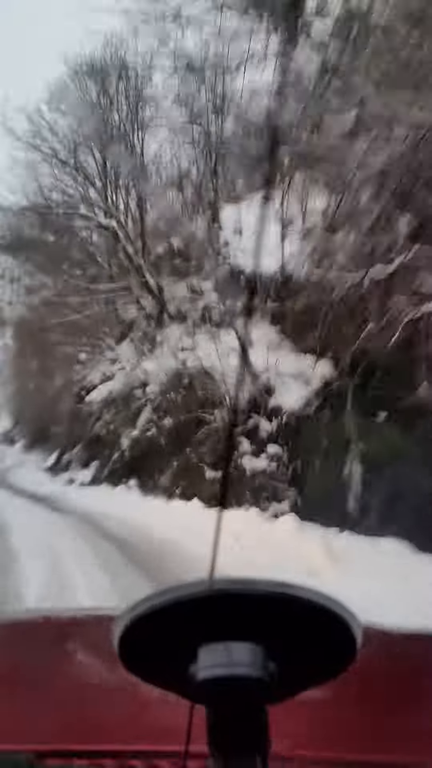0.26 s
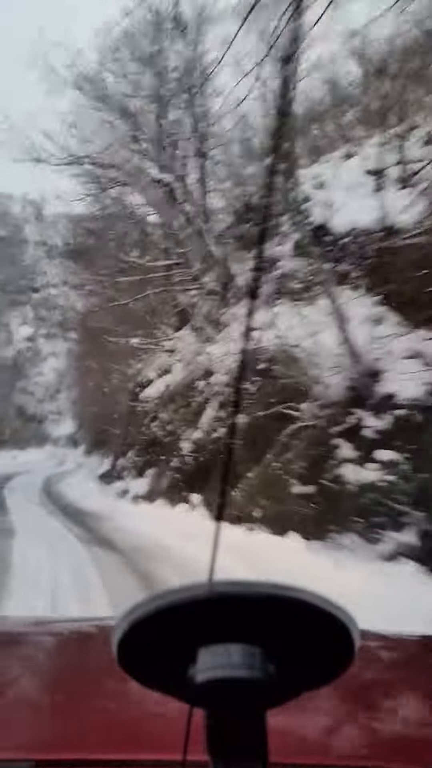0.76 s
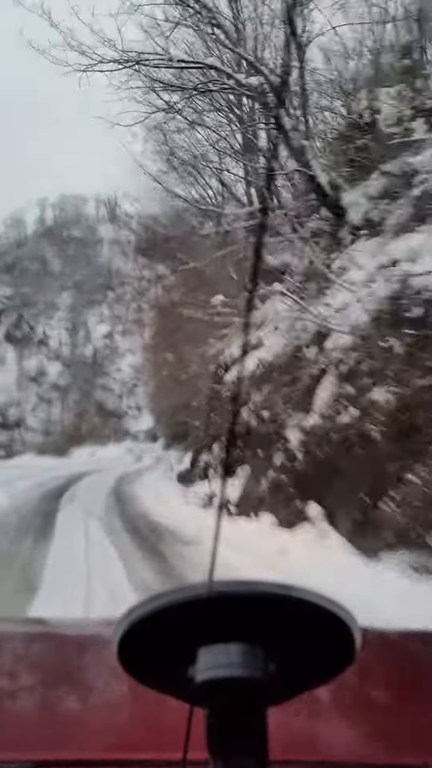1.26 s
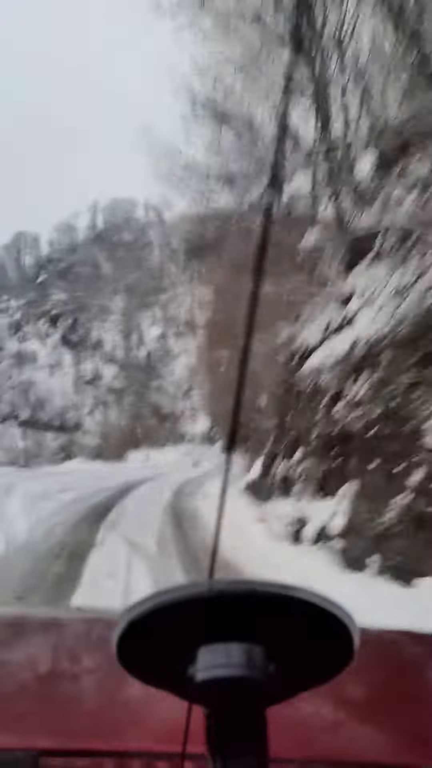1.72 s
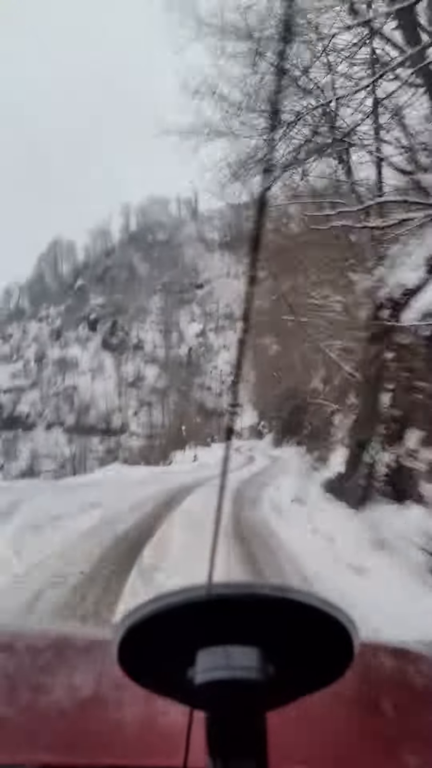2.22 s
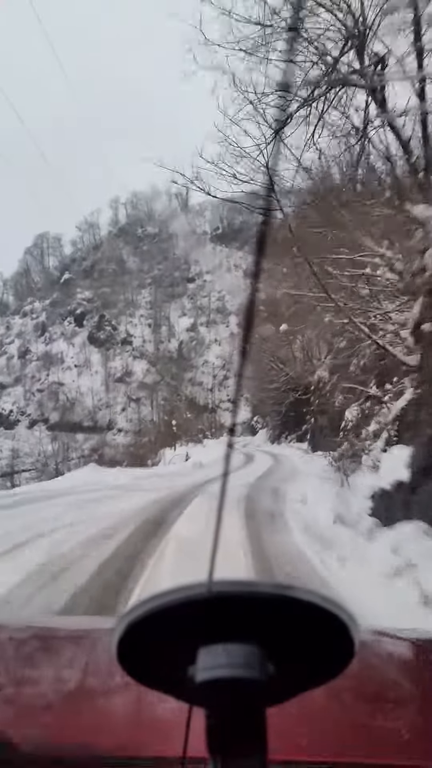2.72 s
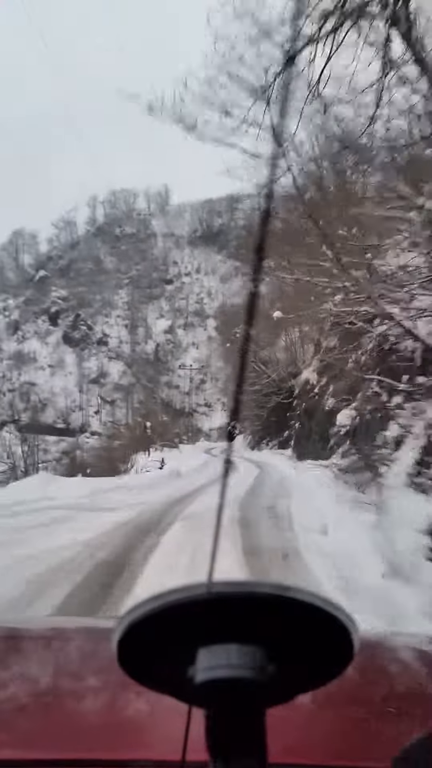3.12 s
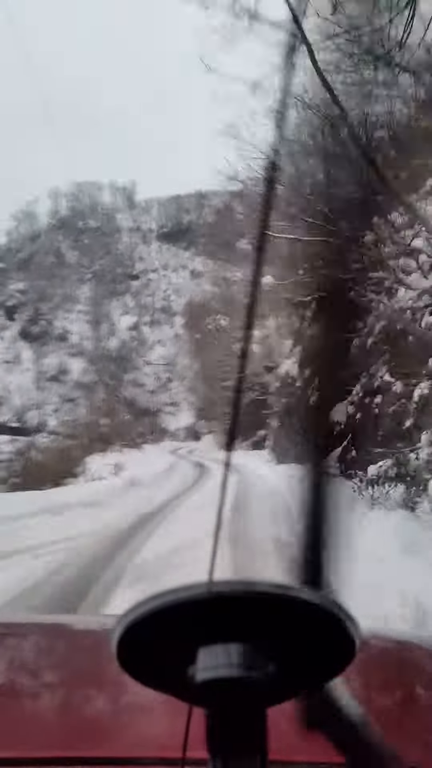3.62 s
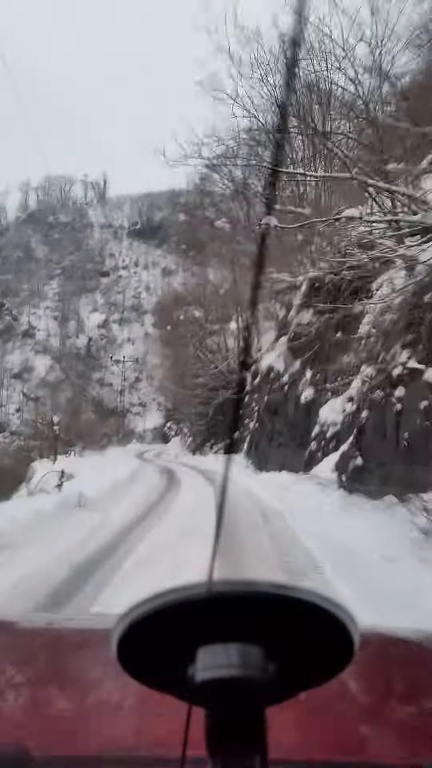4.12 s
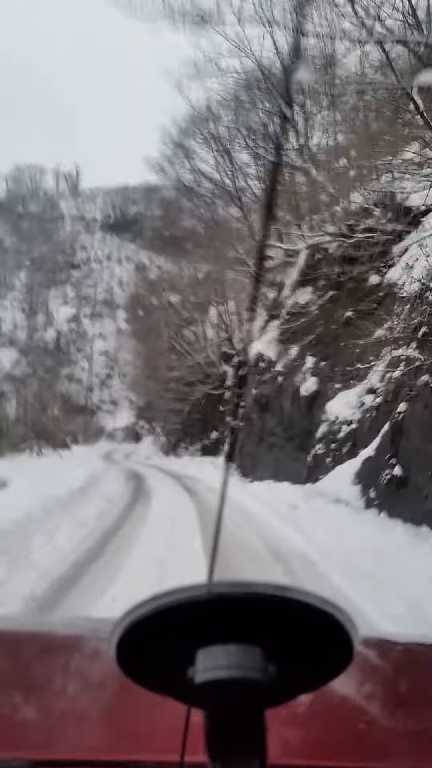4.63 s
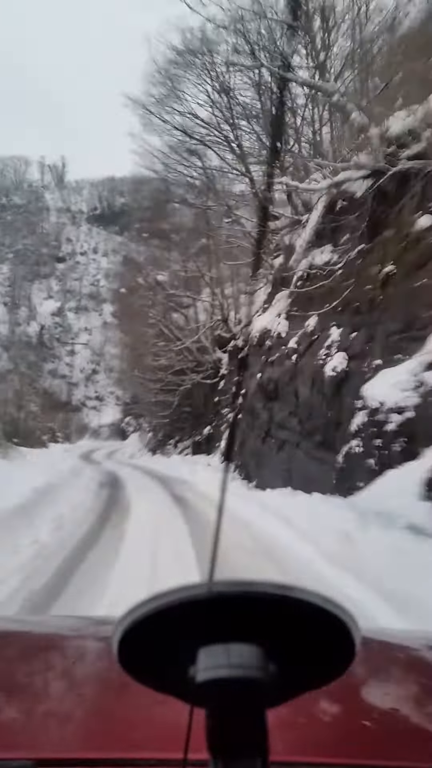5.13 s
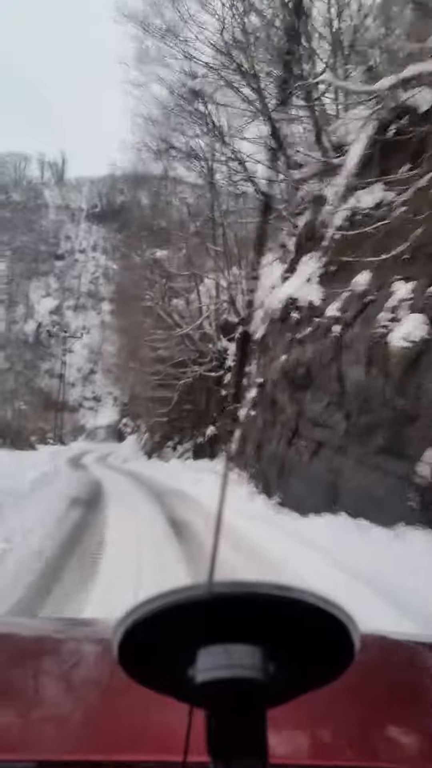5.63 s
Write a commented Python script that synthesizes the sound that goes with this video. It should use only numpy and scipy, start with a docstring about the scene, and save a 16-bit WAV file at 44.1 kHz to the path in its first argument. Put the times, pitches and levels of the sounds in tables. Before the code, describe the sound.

Deep engine drone and bassy tyre roar fill a cab, with faint slush hiss, light trim ticks and one squeaky wiper sweep.

```python
"""After a fifth of a second of near silence a booming engine fades up, heard inside a cab on a snowy road.
The engine is a stack of sines; tyre rumble is coloured noise, and the heater fan adds a steady hum.
The wiper swishes and squeaks with noise and wavering sines; slush sprays as hiss with droplets.
Loose trim ticks in short noise bursts and duller knocks ring the panels.
A phone behind the windscreen hears it all through two microphone ports and limits the peaks."""
import sys
import numpy as np
from scipy import signal
from scipy.fft import rfft, irfft
from scipy.io import wavfile
from scipy.ndimage import uniform_filter1d, minimum_filter1d, map_coordinates

SR = 44100
rng = np.random.default_rng(int(sys.argv[2]) if len(sys.argv) > 2 else 0)


def undo_db(level):
    """Turn decibels back into plain size, where 20 dB means ten times bigger."""
    steps = np.asarray(level, float) / 20
    return 10 ** steps


def to_wav(s):
    """Save 16-bit WAV."""
    ch = np.atleast_2d(s).T  # columns
    pcm = np.round(np.clip(ch, -1, 1) * 32767)  # PCM
    wavfile.write(sys.argv[1], SR, pcm.astype(np.int16))


N = 258426
t = np.arange(N) / SR
bins = np.maximum(np.arange(N // 2 + 1) * SR / N, 1)  # Hz
BURST = 8192  # length of a tick in samples, and number of levels in a random walk
PORT_LAG_S = 0.000344  # the left port hears the cab later


def along(table):
    """Columns of a time table, one value a sample."""
    s, *columns = np.transpose(table)
    return [np.interp(t, s, c) for c in columns]


def at(table, hz):
    """Value of a spectrum on a log-frequency axis."""
    f, v = np.transpose(table)
    return np.interp(np.log(hz), np.log(f), v)


def unit(x):
    """Scale to rms 1."""
    return x / np.sqrt(np.mean(x ** 2))


def walk(rate):
    """Random levels joined smoothly, rate a second; rms 1."""
    levels = rng.standard_normal(BURST)
    return unit(map_coordinates(levels, [t * rate], order=3))


def bell(hz, width):
    """Gain of a resonance over all frequencies."""
    return 1 / np.sqrt(1 + ((bins - hz ** 2 / bins) / width) ** 2)


def swell(s, rise_s, fall_s):
    """Gain that grows to 1 at s and dies away."""
    return np.exp(np.minimum((t - s) / rise_s, (s - t) / fall_s))


def sine(cycles):
    """A sine of rms 1 with a random starting phase, from its running count of cycles."""
    return np.sqrt(2) * np.sin(2 * np.pi * (cycles + rng.random()))


def tone(hz, wobble, rate):
    """A sine of rms 1 whose pitch wavers."""
    return sine(np.cumsum(hz * (1 + wobble * walk(rate))) / SR)


def diffuse():
    """Spectra of two white noises, much alike in the bass and mostly unrelated in the treble."""
    # how much of the noise power both ports share: (pitch_hz, share)
    likeness = [(30, 0.97), (130, 0.98), (290, 0.97), (640, 0.37), (1400, 0.21), (3100, .3), (7000, 0.27),
                (15000, 0.27)]
    share = np.clip(at(likeness, bins), 0, 1)
    both, left, right = (rfft(rng.standard_normal(N)) for _ in range(3))
    return np.sqrt(share) * both + np.sqrt(1 - share) * np.array([left, right])


def engine():
    """Firing orders, each as loud as the cab lets it boom; valve clatter once a firing."""
    # engine speed and effort: (time_s, firing_rate_hz, load_db)
    running = [(.2, 80.22, 6), (.4, 83.88, -2), (.62, 96.95, -7.5), (.9, 77.65, -11.5), (1.05, 72.5, -1),
               (1.22, 67.88, 0.5), (1.6, 79.98, -4.5), (1.8, 85.02, 4.5), (2.05, 81.2, -9.5),
               (2.25, 89.86, -1.5), (2.5, 80.5, -12), (2.7, 69.37, 0.5), (3.3, 71.55, 0.5), (4.1, 74.4, -1),
               (4.8, 77.18, -3), (5.3, 78.2, -4), (5.86, 79, 0.5)]
    # strength of each order before cab and load: (multiple of the firing rate, rms_db)
    orders = [(.5, -23.5), (1, -13), (1.5, -30), (2, -21), (3, -36), (7.5, -50.5), (9.5, -49.5),
              (13.5, -54)]
    # how the cab answers a tone: (pitch_hz, gain_db)
    cab = [(30, 6), (65, 3), (74, 1), (79, -5.5), (86, 0), (95, -12.5), (140, -0.5), (156, 4), (168, -4),
           (200, -8), (520, -11.5), (590, 7.5), (680, -14.5), (745, 4), (850, -4), (970, 5.5), (1050, -1.5),
           (1140, 4)]
    hz, load_db = along(running)
    cycles = np.cumsum(hz * (1 + 0.003 * walk(12))) / SR
    boom = 0
    for k, db in orders:
        # the exhaust drone on the even orders follows the load less
        load_share = 1 if k % 2 else 0.56
        level_db = db + at(cab, k * hz) + load_db * load_share + 1.43 * walk(8)
        boom = boom + undo_db(level_db) * sine(k * cycles)
    clatter = unit(irfft(diffuse() * bell(1900, 1700) ** 2, N))
    clatter = clatter * np.exp(-(cycles % 1) / 0.31)  # dies away within each firing
    return boom + undo_db(-51.5) * clatter


def road():
    """Tyre noise rings the body panels; bands, mostly half an octave, swell together and flicker alone."""
    # rough patches that shake the chassis: (time_s, level_db, half_length_s)
    bumps = [(0.855, -2, 0.18), (1.247, 0.5, 0.24), (1.917, 1, 0.17), (2.6, 1, 0.39), (4.3, 2.5, 0.38),
             (4.9, 3.5, 0.29)]
    # level of the tyre roar: (time_s, level_db)
    roar = [(.2, 0.5), (.55, 0.5), (1, -4), (1.6, -1), (2.6, -1.5), (2.85, -3.5), (3.7, -2), (4.1, -3.5),
            (5.86, -3)]
    # tyre noise before panels and bumps: (pitch_hz, level_db per Hz)
    road_colour = [(12, -61.5), (26, -35.5), (38, -33), (55, -31.5), (100, -33.5), (135, -39), (195, -47.5),
                   (330, -51.5), (400, -58.5), (630, -62), (900, -72), (2000, -79.5), (3300, -83.5),
                   (5000, -96.5), (15500, -116)]
    # cab and panel resonances as each port hears them: (pitch_hz, width_hz, left_db, right_db)
    body = [(41.7, 4.7, 3, 0.5), (103, 55, 1, -1), (330.3, 100, 3, 2.5), (459, 63, 4.5, 1.5),
            (600, 89, -1.5, 4), (659, 45, -2, 2), (775, 60, 7.5, -0.5), (868, 15, 7, 5.5),
            (960, 31, 5.5, 3), (1350, 496, 5.5, 6), (1658, 55, 9.5, 4.5), (2870, 220, 6, 1)]
    bumps_db = -0.6 + sum(db * np.exp(-((t - s) / half_s) ** 2) for s, db, half_s in bumps)
    roar_db, = along(roar)
    body_db = sum(np.outer(db, bell(hz, width) ** 2) for hz, width, *db in body)
    noise = diffuse() * undo_db(at(road_colour, bins) + body_db) * np.sqrt(SR / 2)
    judder_db = walk(14)
    out = 0
    edges = np.r_[0, 30 * 2 ** np.arange(0, 9.5, 0.5), SR]
    for lo_hz, hi_hz in zip(edges, edges[1:]):
        low = 1 / (1 + (hi_hz / 200) ** 4)  # bumps move the bass, roar and judder the rest
        level_db = low * bumps_db + (1 - low) * (roar_db + judder_db) + 0.9 * walk(7)
        band = noise * ((bins >= lo_hz) & (bins < hi_hz))
        out = out + undo_db(level_db) * irfft(band, N)
    return out


def blower():
    """Steady blade tone of the heater fan; it sags while the wiper motor draws current."""
    # blade tone and its overtones: (multiple of the blade rate, rms_db)
    hum = [(1, -26.5), (2, -47.5), (3, -48)]
    age = np.maximum(t - 2.7, 0)  # seconds since the wiper motor started
    sag_s, recover_s = 0.3, 0.74
    # the difference of the two decays peaks near a third, so the pitch dips about 3 Hz
    hz = 222.8 - 10 * (np.exp(-age / recover_s) - np.exp(-age / sag_s))
    cycles = np.cumsum(hz * (1 + 0.0025 * walk(9))) / SR
    return sum(undo_db(db + 0.99 * walk(4.5)) * sine(k * cycles) for k, db in hum)


def squeak(hz, partials_db):
    """A fluttering stick-slip tone with its overtones."""
    phase = 2 * np.pi * np.cumsum(hz + 90 * walk(450)) / SR
    flutter = undo_db(3.5 * walk(300))
    return flutter * sum(undo_db(db) * np.sin((k + 1) * phase) for k, db in enumerate(partials_db))


def swish_and_scrape():
    """Rubber rubbing on glass: a hiss with a rising ring, and a short scrape as the blade breaks loose."""
    # relative colour of the hiss: (pitch_hz, width_hz, level_db)
    glass = [(3000, 2100, -1.5), (4270, 350, -14), (7100, 980, -11), (8760, 300, -17), (11000, 3000, -13)]
    stroke_s = 3.515  # middle of the stroke
    hz = 1100 + (2285 - 1100) * (1 + np.tanh((t - stroke_s) / 0.05)) / 2
    ring = tone(hz, wobble=0.044, rate=300) * (1 + 0.7 * walk(400))
    ring = ring * np.minimum(1, 2 * swell(stroke_s - 0.012, rise_s=0.04, fall_s=0.075))
    colour = sum(undo_db(db) * bell(f, width) ** 2 / np.sqrt(width) for f, width, db in glass)
    hiss = unit(irfft(diffuse() * colour, N))
    stroke = np.minimum(1, 2 * swell(stroke_s + 0.024, rise_s=0.035, fall_s=0.055))
    scrape = swell(2.823, rise_s=0.02, fall_s=0.0091) * undo_db(-38.5 + 2.5 * walk(270))
    ring_gain = undo_db(-41 + np.array([[-6], [0]]))  # nearer the right port
    return (undo_db(-41) * stroke + scrape) * hiss + ring_gain * ring


def arm_squeal():
    """The wiper arm squeals with a falling, wavering tone, louder on the right."""
    arm_s = 3.6
    hz = 3960 - 250 * np.clip(t - arm_s, -1, 1)
    squeal = tone(hz, wobble=0.013, rate=270) * (1 + 0.9 * walk(350))
    return undo_db(-49.5 + np.array([[-7], [0]])) * swell(arm_s, rise_s=0.07, fall_s=0.25) * squeal


def rubber_squeaks():
    """Wiper and seals stick and slip briefly, each squeak gliding between two pitches."""
    # levels before the partial gains: (start_s, length_s, first_hz, last_hz, level_db)
    slips = [(1.787, 0.036, 4340, 4250, -51), (2.787, .021, 2445, 2280, -52),
             (2.798, 0.027, 1733, 1860, -49), (2.802, .02, 11300, 11310, -56),
             (2.818, .018, 9900, 10500, -42.5), (2.883, .032, 4880, 5400, -61),
             (3.681, .023, 8400, 9200, -54.5), (4.299, .028, 4162, 4260, -43.5)]
    # gains of the partials of the low squeaks, from the fundamental up: [gain_db]
    low_partials = [10, 10, 0.5]
    out = 0
    for s, length_s, first_hz, last_hz, db in slips:
        done = np.clip((t - s) / length_s, 0, 1)
        envelope = np.sqrt(np.abs(np.sin(np.pi * done))) * (done < 1)
        partials_db = low_partials if first_hz < 3000 else [4]
        out = out + envelope * undo_db(db) * squeak(first_hz + (last_hz - first_hz) * done, partials_db)
    return out


def blade_whistles():
    """The wet blade edge whistles thinly along wandering pitch curves."""
    # one pitch curve for each whistle: (time_s, pitch_hz)
    curves = [
        [(2.835, 14000), (2.848, 14300), (2.876, 12200), (2.881, 9840), (2.892, 9880), (2.911, 10400),
         (2.915, 12800), (2.932, 13800), (2.975, 13600), (2.99, 13020), (3.01, 13930), (3.052, 13970),
         (3.062, 15100), (3.09, 16100)],
        [(3.69, 13800), (3.713, 14400), (3.728, 13800), (3.733, 11000), (3.748, 9070), (3.753, 11900),
         (3.77, 14000), (3.79, 15400)],
    ]
    out = 0
    for rows in curves:
        hz, = along(rows)
        edge = np.clip(np.minimum(t - rows[0][0], rows[-1][0] - t) / 0.015, 0, 1)
        level_db = -48 - 3.8 * (hz / 1000 - 10) + 4.5 * walk(60)  # weaker when higher
        out = out + edge * undo_db(level_db) * squeak(hz, [4])
    return out


def wiper():
    """The wiper's rubbing, squealing, squeaking and whistling together."""
    return swish_and_scrape() + arm_squeal() + rubber_squeaks() + blade_whistles()


def spray():
    """Slush thrown against the floor: hiss with droplets of uneven size."""
    # slush splashes: (peak_time_s, peak_db, rise_s, fall_s)
    splashes = [(.53, -51.5, 0.094, 0.16), (1.699, -58.5, 0.15, 0.28), (2.13, -52, .01, .08),
                (2.27, -48.5, 0.055, 0.11), (2.42, -55.5, .08, .08), (3.7, -55.5, 0.078, 0.11),
                (4.55, -64, 0.16, 0.044), (5.17, -58, 0.016, .25), (5.361, -60.5, .08, .15),
                (5.619, -63, 0.059, 0.1)]
    # relative colour of the spray: (pitch_hz, level_db per Hz)
    spray_colour = [(2000, -24), (3500, -4), (5000, -12), (5700, -10.5), (7000, -11.5), (8800, -5.5),
                    (10200, -7.5), (12000, -15), (15700, -12)]
    drizzle = undo_db(-67)  # spray between the splashes
    flow = drizzle + sum(undo_db(db) * swell(s, rise_s, fall_s) for s, db, rise_s, fall_s in splashes)
    colour = undo_db(at(spray_colour, bins))
    hiss = unit(irfft(diffuse() * colour, N))
    hits = rng.random(N) < 600 / SR  # about 600 droplets a second
    size_db = np.minimum(2.2 * rng.exponential(size=N), 9)
    drops = hits * rng.standard_normal(N) * undo_db(size_db)
    droplets = unit(irfft(rfft(drops) * colour, N))
    return flow * undo_db(1.2 * walk(30)) * (hiss + 0.12 * droplets)


def knocks():
    """Duller blows on trim and chassis ring the panel modes near each blow's own pitch."""
    # blows, as heard on the right: (time_s, peak_db, centre_hz, softness_s)
    blows = [(.79, -10, 108, 0.019), (1.85, -31, 560, .004), (2.502, -31, 1250, 0.0023),
             (2.83, -19.5, 530, .008), (3.928, -31, 1460, .002), (4.749, -22.5, 1000, .003)]
    # relative panel modes, with time to fall by 60 dB: (pitch_hz, level_db, t60_s)
    panel = [(106.8, 3.5, 0.54), (341.5, 6, 0.13), (500, -6, .12), (608, -3.5, 0.064), (807, -7, 0.049),
             (960, 4, 0.028), (1148, -2.5, 0.056), (1260, -1, 0.044), (1473, -2.5, 0.034), (1694, -2, 0.04)]
    out = 0
    for s, db, hz, soft_s in blows:
        # start the left side early, so that the later port lag makes both arrive together
        age = np.maximum(t - s + np.array([[PORT_LAG_S], [0]]), 0)
        ring = 0
        for f, mode_db, t60 in panel:
            nearness = np.exp(-(np.log(f / hz) / 0.5) ** 2)
            decay = np.exp(-np.log(1000) * age / t60)
            ring = ring + undo_db(mode_db) * nearness * decay * np.sin(2 * np.pi * (f * age + rng.random()))
        ring = ring * (1 - np.exp(-age / soft_s))
        left_db = 4 * (hz > 300)  # the higher knocks come from the left
        out = out + undo_db(db + np.array([[left_db], [0]])) * ring / np.abs(ring).max()
    return out


def ticks():
    """Each tick of loose trim is a short, bright, decaying noise burst."""
    # ticks: (start_s, peak_db)
    taps = [(0.2687, -21.5), (0.5235, -28.5), (1.2132, -43), (2.121, -35), (2.1392, -23), (2.1555, -38),
            (2.252, -32.5), (2.5034, -29.5), (2.5667, -40), (2.9105, -37.5), (2.9808, -37.5),
            (3.672, -32.5), (3.9297, -32), (4.284, -37), (4.3792, -32), (4.5457, -39), (4.958, -38),
            (5.053, -38), (5.6104, -28.5), (5.683, -37)]
    t60_s = 0.024
    out = np.zeros((2, N + BURST))
    decay = np.exp(-np.log(1000) * t[:BURST] / t60_s)
    band = signal.butter(2, [1000, 11000], "bandpass", fs=SR, output="sos")
    for s, db in taps:
        both, left, right = rng.standard_normal((3, BURST))
        noise = both + 0.85 * np.array([left, right])
        burst = signal.sosfilt(band, noise * decay)
        start = int(s * SR)
        out[:, start:start + BURST] += undo_db(db) * burst / np.abs(burst).max()
    return out[:, :N]


def scene():
    """Everything heard in the cab."""
    return engine() + road() + blower() + wiper() + spray() + knocks() + ticks()


def band_limit(x):
    """A steep low-pass at the top of the band."""
    return signal.sosfilt(signal.butter(12, 15820, fs=SR, output="sos"), x)


def record(dry):
    """Two ports of unequal colour, the left one later; the microphone fades up and a limiter holds peaks."""
    # balance of the ports before the right cavity's ring: (pitch_hz, left_minus_right_db)
    balance = [(60, -1.6), (200, -0.6), (480, -1.5), (620, -3.5), (1100, -3), (1900, -5.5), (2500, -5),
               (3300, -4.5), (4000, -8.5), (5100, -13.5), (6500, -12), (7600, -7), (9200, -3.5),
               (10000, -2.5), (15500, -3)]
    # ring of the right port's cavity: pitch_hz, width_hz, gain_db
    cavity = (8700, 1100, 5.4)
    half_db = at(balance, bins) / 2
    hz, width, db = cavity
    # below about 120 Hz the boom is one pressure at both ports, so the lag vanishes there
    lag_s = PORT_LAG_S / (1 + (120 / bins) ** 4)
    left = undo_db(half_db) * np.exp(-2j * np.pi * bins * lag_s)
    right = undo_db(db * bell(hz, width) ** 2 - half_db)
    heard = irfft(rfft(dry) * np.array([left, right]), N)
    # nearly shut at first, then the microphone opens softly and fades up
    open_s, fade_s = 0.21, 0.39
    fade = np.minimum(1, undo_db(-34) + (t - open_s) / fade_s)
    heard = heard * np.where(t < open_s, undo_db(-85), fade)
    # the limiter looks ahead and eases its gain down around each peak
    gain = np.minimum(1, 0.9 / (np.abs(heard).max(axis=0) + 1e-9))
    gain = uniform_filter1d(minimum_filter1d(gain, size=1200), size=1200)
    return band_limit(heard * gain)


dry = scene()
out = record(dry)
to_wav(out)
```